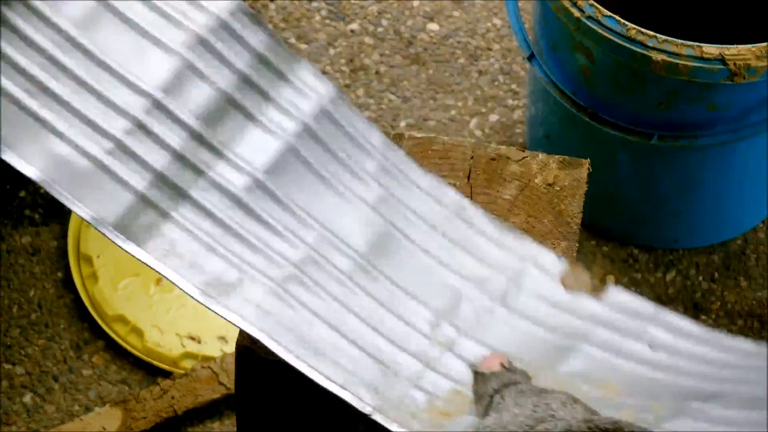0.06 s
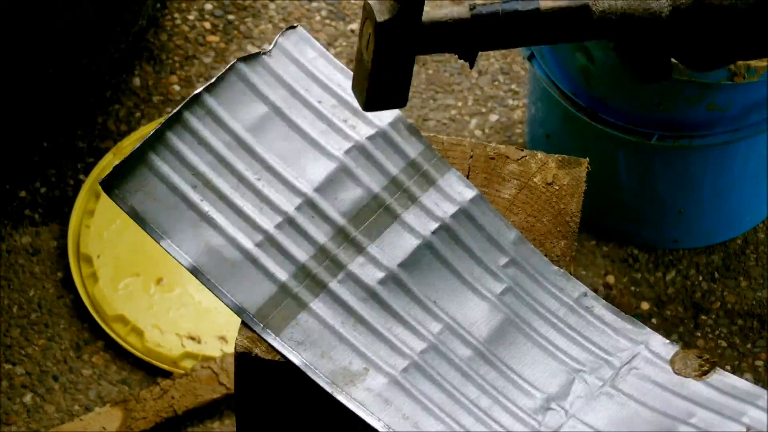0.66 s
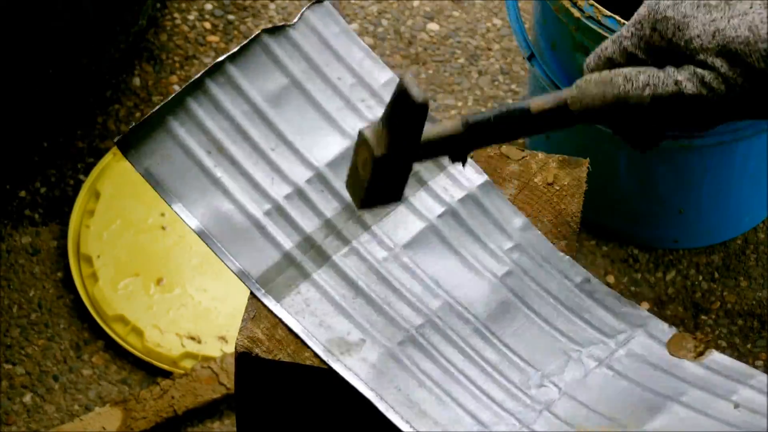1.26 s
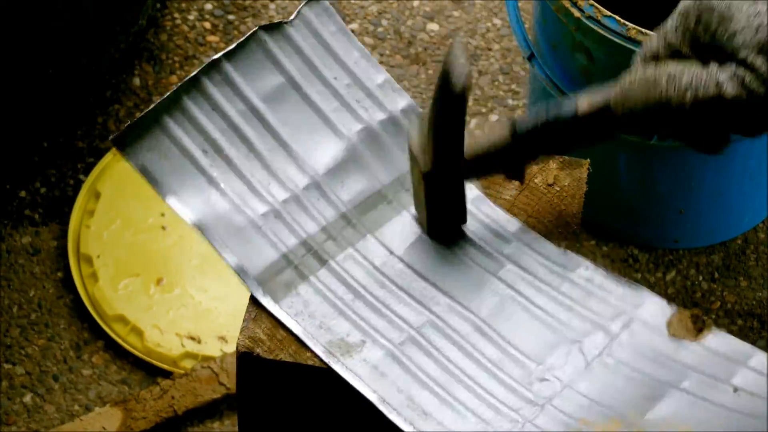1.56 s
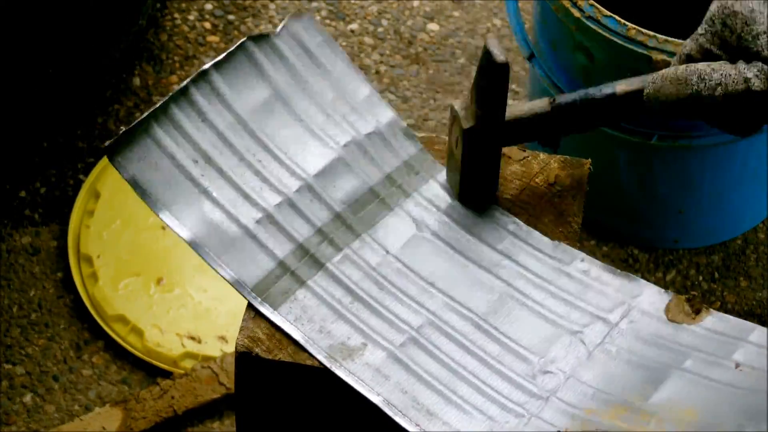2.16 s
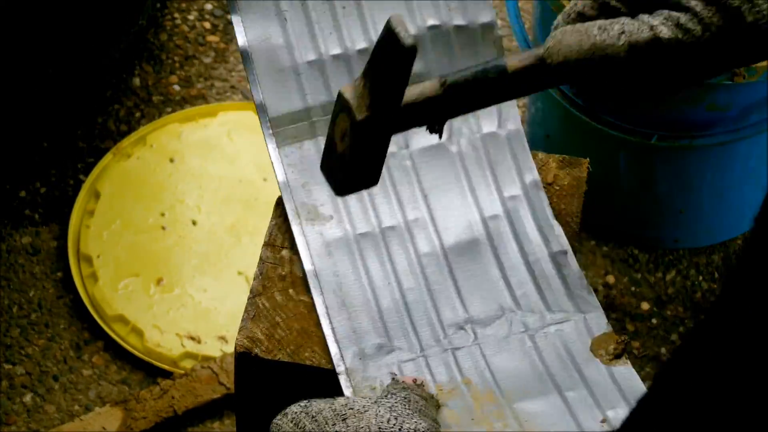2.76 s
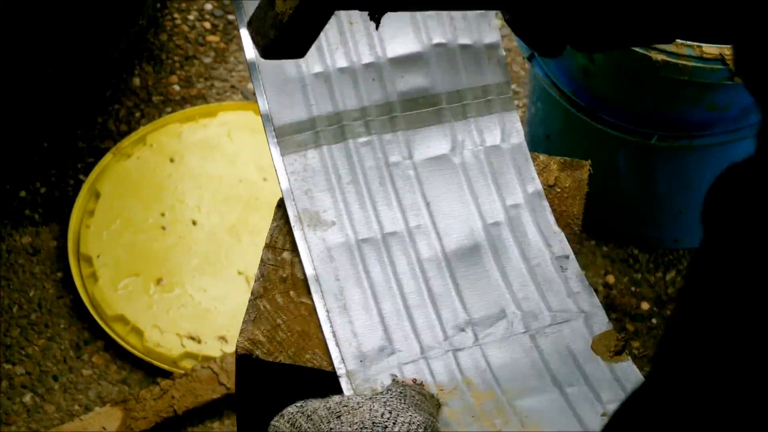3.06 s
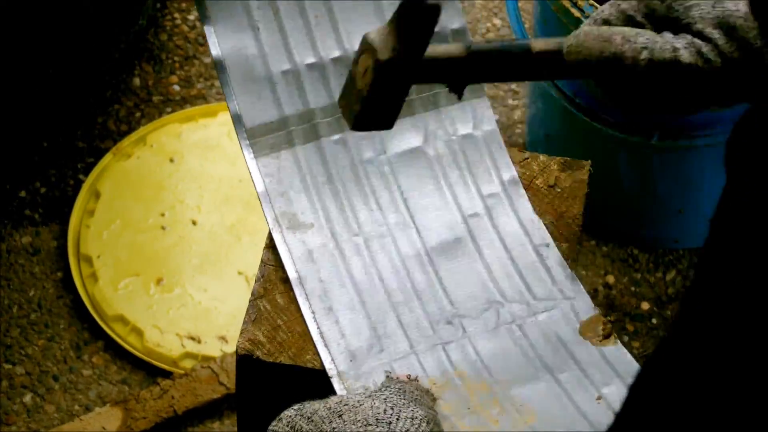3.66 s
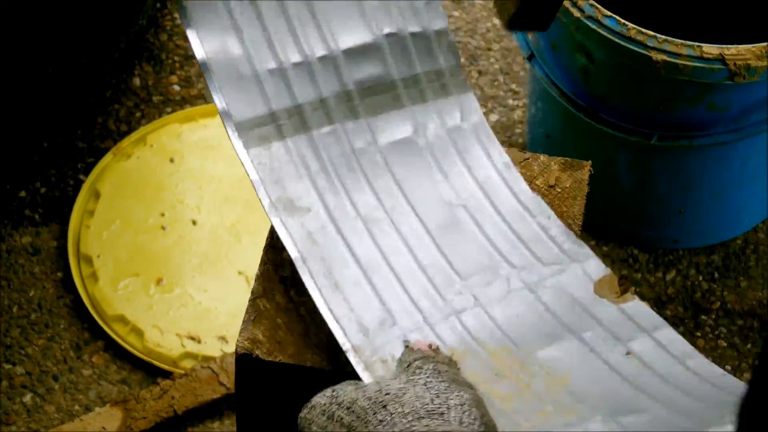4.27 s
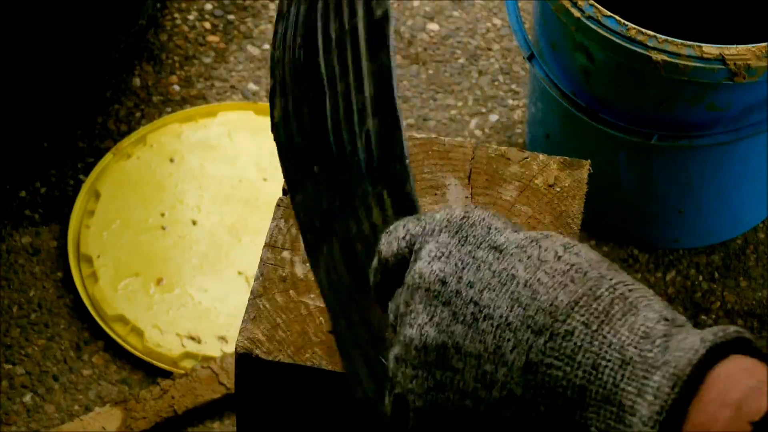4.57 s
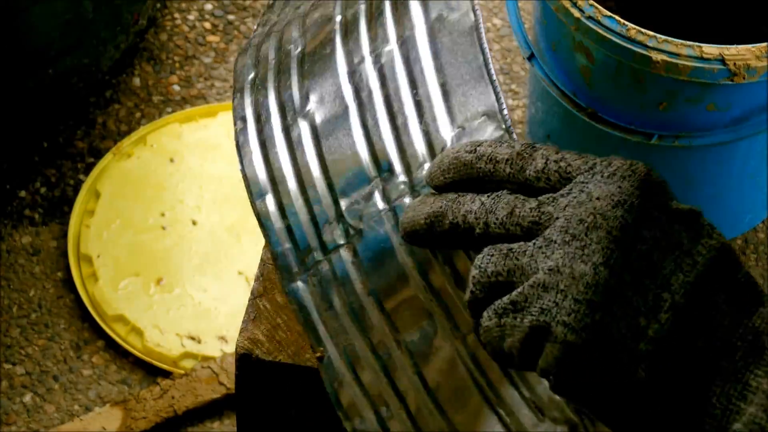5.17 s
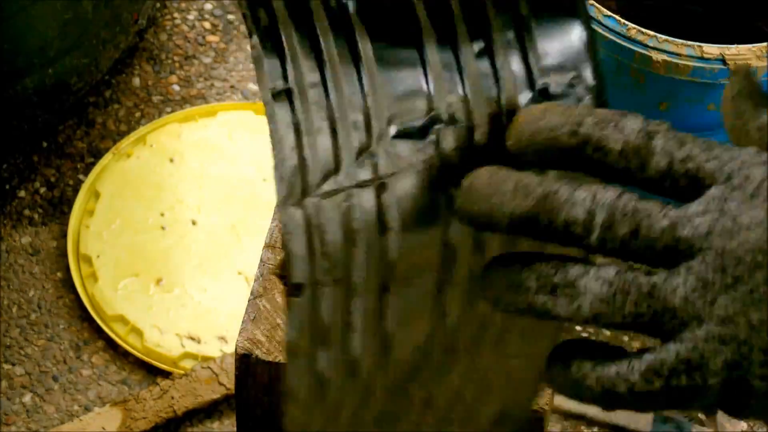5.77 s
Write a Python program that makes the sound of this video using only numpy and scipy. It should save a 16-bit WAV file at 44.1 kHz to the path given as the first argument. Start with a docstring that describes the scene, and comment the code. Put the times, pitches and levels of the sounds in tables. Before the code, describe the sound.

Close, loud hammering on thin sheet steel lying on a wooden block in a yard. After a few light knocks and scrapes come two even runs of six blows, about five a second, separated by a short pause as the metal is moved. Each hit cracks, chatters against the wood and dies quickly, slightly distorted, with a faint echo. The lifted sheet rustles softly and clinks at the end, over a steady low rumble.

```python
"""Outdoors, over a low rumble, a strip of thin corrugated steel scrapes and knocks on a wooden block.
A hammer flattens it with six blows: each cracks, sets the strip chattering until it slaps back on the
wood, and rings out fast, while the close microphone overloads and a far wall returns a faint echo.
The strip is shifted and knocks lightly, then takes six more blows.
At the end it slides, is turned over and clinks, ringing more freely off the wood."""
import sys
import numpy as np
from scipy import signal
from scipy.fft import rfft, irfft, next_fast_len
from scipy.io import wavfile
from scipy.ndimage import map_coordinates

SR = 44100
rng = np.random.default_rng(int(sys.argv[2]) if len(sys.argv) > 2 else 0)


def bounce(signal):
    """Save signal as a 16-bit WAV file at the path given by the first command-line argument."""
    frames = np.transpose(np.atleast_2d(signal))
    limited = np.clip(frames, -1, 1)
    pcm = np.round(limited * 32767).astype(np.int16)
    wavfile.write(sys.argv[1], SR, pcm)


N = 260631
AGE = np.arange(SR // 2) / SR  # time since a contact, s

# spectra of the deep rumble and of the outdoor wash: f/Hz, level/dB
RUMBLE_SPECTRUM = [(10, -30.5), (20, 5), (30, -0.5), (50, -5), (70, -9), (95, -16.5), (115, -20),
                   (145, -18.5), (200, -29.5), (400, -75)]
AIR_SPECTRUM = [(80, -10.5), (170, -11.5), (260, 1.5), (400, -3), (700, -5.5), (1200, -14), (2500, -27.5),
                (5000, -35), (9000, -38), (15000, -46.5)]
# reverberation time of the yard: f/Hz, t60/s
YARD_DECAY = [(150, .5), (1000, 0.5), (1700, 0.4), (2500, 0.36), (5000, 0.3), (8000, 0.36), (14000, .2)]
# spectrum of the wall's reflection: f/Hz, level/dB
WALL_SPECTRUM = [(150, -10.5), (1000, -5.5), (3000, -1), (6000, -3), (14000, -7)]

# moves of the strip over the block and through the glove: middle t/s, half length/s, level/dB
SLIDE_STROKES = [(0, .026, -48), (0.348, .05, -58), (.77, .03, -65), (2.458, .075, -49), (4.621, 0.28, -66),
                 (4.833, .014, -66), (5.65, .11, -61.5)]
# spectrum of their friction: f/Hz, level/dB
FRICTION_SPECTRUM = [(300, -0.5), (1200, 4.5), (3500, -1), (6000, -12), (9000, -22), (15000, -30)]
# light contacts of strip and block: t/s, level/dB, thump/dB, sizzle/dB
KNOCK_EVENTS = [(0.48, -17.5, 2, -2.5), (0.714, -32.5, -1, -20), (0.8453, -18.5, 7, -13),
                (2.4316, -23, 6, -22), (2.707, -15.5, 1, -2)]
# spectrum of a knock's dense modes: f/Hz, level/dB
KNOCK_SPECTRUM = [(60, -16), (150, 10.5), (300, -20), (550, 0), (800, 1), (1600, -2), (3000, -1),
                  (3700, -13.5), (6500, -22.5), (9000, -39), (15000, -45)]
# contacts of the strip where it is free of the block: t/s, level/dB, thump/dB, singing f/Hz, singing/dB
CLINK_EVENTS = [(1.846, -18, 4, 8700, -8), (5.3344, -12.5, -2, 9000, -20.5), (5.4217, -16, -2, 8800, -26),
                (5.465, -30, 15, 2810, -23), (5.535, -39.5, 17, 1380, 1), (5.554, -41, 16, 1380, 2),
                (5.733, -43.5, 20.5, 1390, -11), (5.861, -23, 5, 3730, 3), (5.8682, -15.5, 4.5, 3700, -4)]
# spectrum of a clink's dense modes: f/Hz, level/dB
CLINK_SPECTRUM = [(80, -8.5), (180, 3.5), (350, -6), (600, -2.5), (900, 0), (1500, 2), (2100, -12.5),
                  (2800, -5.5), (4000, -15), (5500, -18.5), (7000, -31.5), (9200, -31.5), (15000, -51.5)]
# modes of the lifted strip: f/Hz, level/dB, t60/s
LIFTED_MODES = [(187, -3.5, 0.14), (657, 2, 0.096), (1170, -4, 0.092), (1450, -3, 0.22), (1610, 0.5, 0.12),
                (2630, -10, .18), (2590, -10, 0.11), (3095, -16.5, .14), (3620, -14, 0.15)]

# modes of the strip lying on the block: f/Hz, level/dB
LYING_MODES = [(132, -5), (178, -1), (205, -6), (269, -9.5), (353, -15), (398, -7.5), (425, -1),
               (530, -0.5), (665, -6.5), (708, -4), (785, -5), (810, -1), (848, -4.5), (1058, -3),
               (1190, -4), (1340, -0.5), (1386, 2), (1521, 3), (1575, -1), (1865, 0), (1962, -11.5),
               (2097, -1), (2188, -4.5), (2433, -8), (2568, -9.5)]
# spectrum of the dense, weaker modes between them: f/Hz, level/dB
CRASH_SPECTRUM = [(50, -30.5), (100, -13.5), (150, -19), (300, -4), (600, -6), (1000, -5.5), (1500, 0),
                  (2200, -1.5), (3200, -13.5), (5500, -26), (8000, -33.5), (15000, -46)]
# decay time of the hammered strip: f/Hz, t60/s
STRIP_DECAY = [(150, 0.23), (700, 0.19), (2000, 0.13), (5000, 0.13), (12000, 0.14)]
# spectrum of steel striking steel: f/Hz, level/dB
CRACK_SPECTRUM = [(60, -31), (160, -3), (350, -6.5), (800, 4.5), (1500, 8), (3000, -2.5), (5500, -11.5),
                  (9000, -26), (15000, -30)]
# blows: t/s, level/dB, thump/dB, chatter time/s, lower singing f/Hz, upper singing f/Hz, singing/dB
HAMMER_BLOWS = [(1.1882, 0, 0, 0.042, 840, 1462, -2), (1.3929, 0.4, 1.5, 0.04, 417.4, 1302, -3),
                (1.5901, -1, 3.5, 0.029, 438, 1528, -1), (1.784, -0.66, -0.5, .044, 511, 1530, -4.5),
                (1.973, -1.5, -1.5, .028, 530.4, 1372, -0.5), (2.1633, -1.7, 0, 0.019, 510, 1657, 2.5),
                (3.179, -1.5, 7, 0.028, 439, 1408, -9.5), (3.3818, -0.9, 8.5, .025, 429, 1346, 2.5),
                (3.5621, -1.6, 5.5, .023, 1024, 1183, -2), (3.7387, 1, -.5, 0.016, 852, 1580, -6),
                (3.9202, -1, 6, 0.017, 739, 1353, -4), (4.105, 0, 4.5, .03, 845, 1935, -5.5)]


def amp(db):
    """Amplitude ratio of a level in decibels."""
    return 10 ** (np.asarray(db) / 20)


def unit(x):
    """Normalisation to rms 1."""
    return x / np.sqrt(np.mean(x ** 2) + 1e-20)


def along(points, hz):
    """Interpolation of (f/Hz, value) points on a logarithmic frequency axis."""
    f, v = np.transpose(points)
    return np.interp(np.log(hz + 1), np.log(f), v)


def filtered(x, response):
    """Linear filtering: the spectrum is multiplied by a frequency response."""
    n = x.shape[-1]
    padded = next_fast_len(n + SR // 8)
    hz = np.fft.rfftfreq(padded, 1 / SR)
    return irfft(rfft(x, padded) * response(hz), padded)[..., :n]


def noise(spectrum, size=len(AGE)):
    """Gaussian noise of rms 1 with the given shape of spectral density."""
    return unit(filtered(rng.standard_normal(size), lambda hz: amp(along(spectrum, hz))))


def wobble(rate, size=len(AGE)):
    """Random modulation: a smooth curve with rate knots a second."""
    return map_coordinates(rng.standard_normal(8192), [np.arange(size) * rate / SR], mode="wrap")


def rise(seconds):
    """Smooth onset, as when a contact force builds up."""
    return 1 - np.exp(-(AGE / seconds) ** 2)


def fade(t, t60):
    """Free exponential decay, by 60 dB in t60 seconds."""
    return np.exp(-np.log(1000) * np.maximum(t, 0) / t60)


def damped(x, t60s, hold=0):
    """Frequency-dependent damping, which sets in after hold seconds."""
    hz, t, spectra = signal.stft(x, SR, nperseg=256)
    decay = fade(t - hold, along(t60s, hz)[:, None])
    return signal.istft(spectra * decay, SR, nperseg=256)[1][:len(x)]


def mode(hz, waver=0, bend=0):
    """Normal mode: changing contact shifts its phase (waver/rad); it glides up as a dent springs back."""
    phase = rng.uniform(0, 2 * np.pi) + waver * wobble(50)
    cycles = hz * np.cumsum(1 - bend * np.exp(-AGE / 0.023)) / SR
    return np.sqrt(2) * np.sin(2 * np.pi * cycles + phase)


def add(track, s, sound):
    """Superposition of a sound on the track at s seconds."""
    part = track[max(round(s * SR), 0):][:len(sound)]
    part += sound[:len(part)]


def background(rumble_db=-30.5, air_db=-50):
    """Ambient noise: a deep rumble and a soft wash, each slightly modulated in amplitude."""
    rumble = amp(rumble_db + 0.87 * wobble(12, N)) * noise(RUMBLE_SPECTRUM, N)
    air = amp(air_db + 0.6 * wobble(1, N)) * noise(AIR_SPECTRUM, N)
    return rumble + air


def wall_echo(x, delay_s=0.154, smear_t60=0.11):
    """Reflection: a wall about 26 m away returns the sound late, smeared by scattering."""
    out = np.zeros(N)
    scatter = noise(WALL_SPECTRUM) * rise(0.0055) * fade(AGE, smear_t60)
    add(out, delay_s, signal.fftconvolve(x, scatter / np.linalg.norm(scatter)))
    return out


def yard_reverb(x):
    """Diffuse reverberation: many reflections merge into a decaying tail of noise."""
    tail = damped(rng.standard_normal(len(AGE)), YARD_DECAY) * (1 - np.exp(-AGE / 0.0067))
    return signal.fftconvolve(x, tail / np.linalg.norm(tail))[:N]


def slides(grain_db=2, uneven_db=4):
    """Sliding friction: gritty noise swells and fades unevenly with each move of the strip."""
    t = np.arange(N) / SR
    strokes = sum(amp(db) * np.exp(-((t - s) / half) ** 2) for s, half, db in SLIDE_STROKES)
    friction = noise(FRICTION_SPECTRUM, N)
    roughness = amp(grain_db * wobble(180, N) + uneven_db * wobble(20, N))
    return strokes * unit(friction * roughness)


def strip_ring(colour, scatter_db, waver):
    """Modal superposition: each contact point excites the lying strip's modes in new shares."""
    shares = rng.standard_normal(len(LYING_MODES))
    return sum(amp(db + colour(hz) + scatter_db * share) * mode(hz, waver)
               for (hz, db), share in zip(LYING_MODES, shares))


def knocks(dense_db=-9, ring_db=-21, t60=0.13):
    """Impulse response: a light contact with the block rings briefly, with little treble."""
    out = np.zeros(N)
    for s, db, thump_db, sizzle_db in KNOCK_EVENTS:
        colour = lambda hz: along([(250, thump_db), (1200, 0), (5000, sizzle_db)], hz)
        dense = amp(dense_db) * filtered(noise(KNOCK_SPECTRUM), lambda hz: amp(colour(hz)))
        ring = amp(ring_db) * strip_ring(colour, scatter_db=1.5, waver=0.13)
        add(out, s, amp(db) * (dense + ring) * rise(0.00092) * fade(AGE, t60))
    return out


def clinks(contact_db=-8, ring_db=-18, pair_db=-8, snap_s=0.0019, t60=0.14, pair_t60=0.091):
    """Free vibration: the lifted strip snaps and rings, and two close modes beat."""
    out = np.zeros(N)
    for s, db, thump_db, sing_hz, sing_db in CLINK_EVENTS:
        colour = lambda hz: along([(400, thump_db), (1200, 0)], hz)
        dense = filtered(noise(CLINK_SPECTRUM), lambda hz: amp(colour(hz)))
        snap = dense * np.exp(-(AGE / snap_s) ** 2) / np.std(dense[:SR // 250])
        snap_db = 19.5 + 0.06 * db  # harder contacts are sharper
        contact = amp(contact_db) * (dense * fade(AGE, t60) + amp(snap_db) * snap)
        ring = sum(amp(level + rng.normal(0, 3)) * mode(hz, waver=0.32) * fade(AGE, life)
                   for hz, level, life in LIFTED_MODES)
        pair = unit(mode(sing_hz, waver=0.82) + mode(sing_hz * 1.012, waver=0.94))
        sing = amp(pair_db + sing_db) * pair * fade(AGE, pair_t60)
        add(out, s, amp(db) * (contact + amp(ring_db) * ring + sing) * rise(0.0016))
    return out


def touches(touch_db=-27, flat_loss=0.7, lead_s=0.0016):
    """Initial contact: just before each blow the hammer's face presses the arched strip down."""
    out = np.zeros(N)
    for s, db, thump_db, *_ in HAMMER_BLOWS:
        level_db = db + touch_db - flat_loss * thump_db  # a strip that thumps lies flat, with little arch
        add(out, s - lead_s, amp(level_db) * noise(CRACK_SPECTRUM) * rise(0.00091) * fade(AGE, 0.04))
    return out


def rebounds(rebound_db=-19.5, gain_db_per_s=198, slap_db=-6, twang_db=-1, t60=0.13):
    """Elastic rebound: the strip slaps back twice with a rising twang, harder after longer chatter."""
    out = np.zeros(N)
    for s, db, _, chatter_s, _, upper_hz, _ in HAMMER_BLOWS:
        first_db = db + rebound_db + gain_db_per_s * chatter_s
        landing_s = 0.75 * chatter_s
        twang_hz = 0.92 * upper_hz
        for delay, level_db in [(landing_s, first_db), (1.6 * landing_s, first_db - 4)]:
            twang = unit(sum(mode(twang_hz * ratio, waver=0.22, bend=0.072) for ratio in (0.93, 1, 1.06)))
            slap = amp(slap_db) * noise(CRASH_SPECTRUM) + amp(twang_db) * twang
            add(out, s + delay, amp(level_db) * slap * rise(0.0014) * fade(AGE, t60))
    return out


def blow_colour(hz, thump_db, lower_hz, belly_db=3.5, belly_octaves=0.45):
    """Selective excitation, in dB: the block adds bass, the struck spot favours modes near lower_hz."""
    mid_db = 2 + 0.46 * thump_db  # a strip lying flat also sounds fuller
    tilt = along([(200, thump_db), (430, 1.5), (820, mid_db), (1600, 0), (5000, 12.5)], hz)
    return tilt + belly_db * np.exp(-(np.log2((hz + 1) / lower_hz) / belly_octaves) ** 2)


def blows(crash_db=-11, ring_db=-23, lower_db=-14, upper_db=-13, chatter_db=1.5, sag_db_per_s=140,
          crack_db=7, crack_s=0.0044, thud_db=-14, thud_hz=185):
    """Impact excitation: a crack and a thud; chatter on the wood sustains the modes, then they decay."""
    out = np.zeros(N)
    for s, db, thump_db, chatter_s, lower_hz, upper_hz, sing_db in HAMMER_BLOWS:
        colour = lambda hz: blow_colour(hz, thump_db, lower_hz)
        crash = amp(crash_db) * filtered(noise(CRASH_SPECTRUM), lambda hz: amp(colour(hz)))
        chatter = amp(chatter_db * wobble(220))
        ring = amp(ring_db) * strip_ring(colour, scatter_db=3, waver=0.85)
        # two modes with an antinode under the hammer sing out
        lower = amp(sing_db + lower_db) * mode(lower_hz, waver=0.16, bend=0.022) * fade(AGE, 0.61)
        upper = amp(sing_db + upper_db) * mode(upper_hz, waver=0.25, bend=0.015)
        body = damped(crash * chatter + ring + lower + upper, STRIP_DECAY, hold=chatter_s)
        sag = amp(-sag_db_per_s * np.minimum(AGE, chatter_s))
        crack = amp(crack_db) * noise(CRACK_SPECTRUM) * np.exp(-AGE / crack_s)
        # the block takes the blow as a short low push
        thud = amp(thud_db + thump_db) * np.sin(2 * np.pi * thud_hz * AGE) * fade(AGE, 0.083)
        add(out, s, amp(db) * (body * sag + crack + thud))
    return out


def scene(yard_db=-25, echo_db=-44, hiss_db=-77):
    """Superposition at one close microphone; each of the two channels adds its own faint hiss."""
    steel = touches() + blows() + rebounds() + knocks() + clinks() + slides()
    reflections = amp(yard_db) * yard_reverb(steel) + amp(echo_db) * wall_echo(steel)
    mono = steel + reflections + background()
    return mono + amp(hiss_db) * rng.standard_normal((2, N))


def record(dry, top_hz=15900):
    """Overload and band limiting: the blows clip at full scale, then pass a steep low-pass filter."""
    clipped = np.clip(dry, -1, 1)
    return filtered(clipped, lambda hz: 1 / np.sqrt(1 + (hz / top_hz) ** 240))


dry = scene()
out = record(dry)
bounce(out)
```